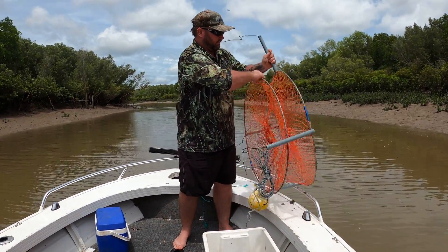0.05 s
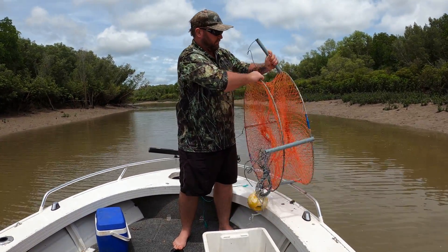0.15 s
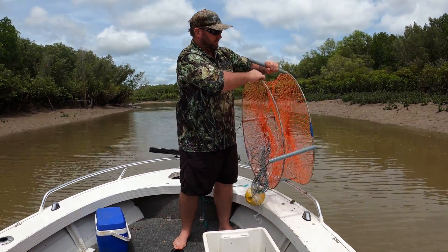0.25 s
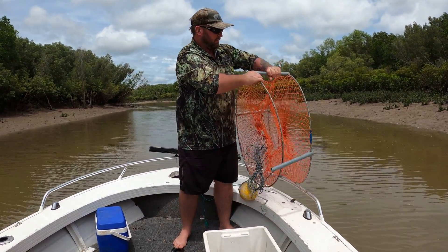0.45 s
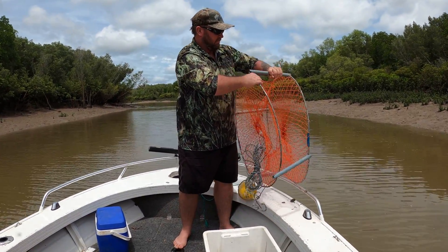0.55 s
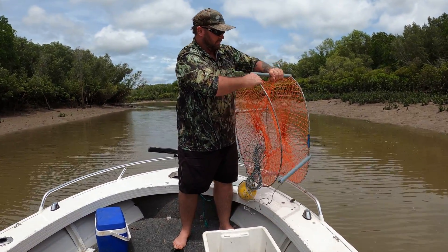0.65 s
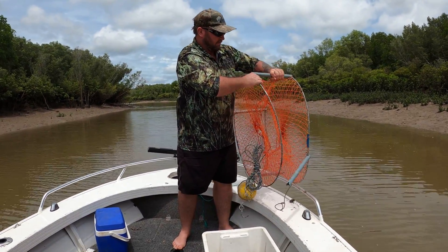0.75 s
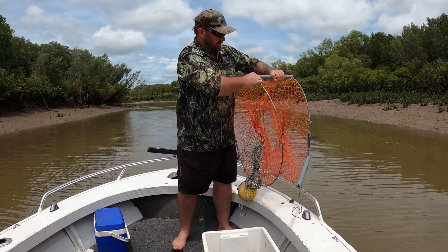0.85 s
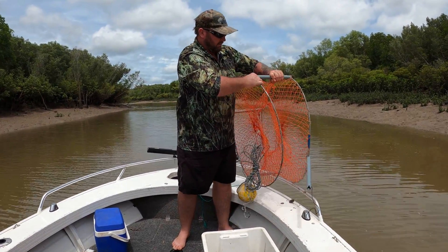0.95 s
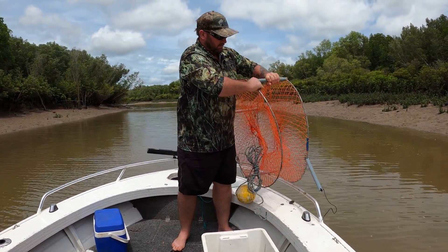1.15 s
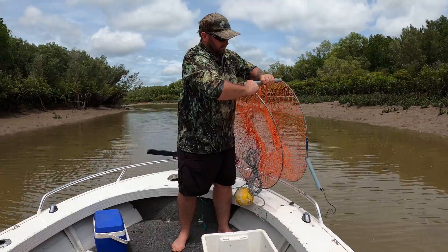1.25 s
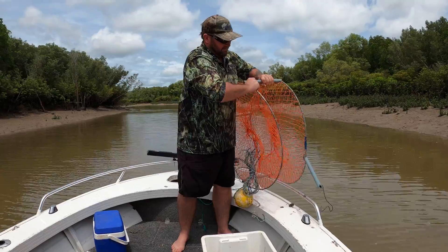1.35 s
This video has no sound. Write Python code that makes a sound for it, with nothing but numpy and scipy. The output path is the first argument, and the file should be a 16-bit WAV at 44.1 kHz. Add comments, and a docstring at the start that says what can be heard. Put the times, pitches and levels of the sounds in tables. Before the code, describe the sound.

A netted crab pot clatters against a small boat on a creek: two ringing metal knocks with rebounds and hollow booms, then a soft scrape and light ticks. Faint wind and water rumble underneath.

```python
"""Crab pot on the bow

A netted crab pot is handled on a small boat. Its metal frame knocks on the gunwale twice, each time
with a rebound: the frame clacks, the gunwale and deck ring, the hull booms. Between the knocks wire
ticks, the net rustles and the hoop scrapes. Faint wind and creek water rumble around the hull."""
import sys
import numpy as np
from scipy.fft import rfft, irfft, next_fast_len
from scipy.io import wavfile
from scipy.ndimage import map_coordinates

SR = 44100
rng = np.random.default_rng(int(sys.argv[2]) if len(sys.argv) > 2 else 0)


def persist_wave(psi):
    """Save psi, clipped to +-1, as 16-bit WAV."""
    counts = np.round(np.clip(psi, -1, 1) * 32767).astype(np.int16)
    wavfile.write(sys.argv[1], SR, np.atleast_2d(counts).T)


N = 61739
T = np.arange(N) / SR


def amp(db):
    """Decibels to gain."""
    return 10 ** (np.asarray(db) / 20)


def unit(x):
    """Scale to rms 1."""
    return x / np.sqrt(np.mean(x ** 2) + 1e-20)


def along(points, hz):
    """Read a curve of (f/Hz, value) points on a log frequency axis."""
    f, value = np.transpose(points)
    return np.interp(np.log(hz + 1), np.log(f + 1), value)


def filtered(x, response):
    """EQ x with a response given as a function of frequency."""
    size = next_fast_len(N + 8192)
    return irfft(rfft(x, size) * response(np.fft.rfftfreq(size, 1 / SR)), size)[..., :N]


def noise(spectrum):
    """Coloured noise of rms 1."""
    return unit(filtered(rng.standard_normal(N), lambda hz: amp(along(spectrum, hz))))


def wobble(rate):
    """A smooth random curve, rate knots a second."""
    return map_coordinates(rng.standard_normal(2048), [T * rate], mode="wrap")


def add(track, s, sound):
    """Mix a sound into the track at s seconds."""
    part = track[max(round(s * SR), 0):][:len(sound)]
    part += sound[:len(part)]


def stroke(start, end):
    """The envelope of one rub: it swells and fades as a rounded arch."""
    return np.sqrt(np.abs(np.sin(np.pi * np.clip((T - start) / (end - start), 0, 1))))


def decay(t, t60):
    """An envelope that falls 60 dB in t60 seconds."""
    return np.exp(-np.log(1000) * t / t60)


def ring(modes, rise_s, scatter_db=2, pitch=1, tilt_db=0, phase_spread=1, detune=0, size=32768):
    """A struck part's decaying modes; levels, phases and, with detune, pitches vary per blow."""
    hz, db, t60 = np.transpose(modes)[:, :, None]
    t = T[:size]
    gain = amp(db + tilt_db * np.log2(hz / hz[0]) + scatter_db * rng.standard_normal(hz.shape))
    hz = hz * pitch * (1 + detune * rng.standard_normal(hz.shape))
    phase = phase_spread * rng.uniform(-0.57, 0.43, hz.shape)
    partials = gain / np.linalg.norm(gain) * np.sin(2 * np.pi * (hz * t + phase)) * decay(t, t60)
    return np.sqrt(2) * partials.sum(0) * (1 - np.exp(-t / rise_s))


def burst(spectrum, t60_curve, rise_s, tilt_db=0, size=32768):
    """The dense modes of a blow: noise that dies band by band, with a quiet, longer after-rattle."""
    tail_db, tail_stretch = -18, 2.5
    hz, t = np.fft.rfftfreq(size, 1 / SR), T[:size]
    colour = amp(along(spectrum, hz) + tilt_db * np.log2(np.clip(hz, 1500, 9000)))
    bins = rfft(unit(irfft(rfft(rng.standard_normal(size)) * colour)))
    centres_hz = np.geomspace(250, 16000, 7)
    out = np.zeros(size)
    for centre, weights in zip(centres_hz, np.eye(len(centres_hz))):
        band = irfft(bins * along(np.c_[centres_hz, weights], hz))
        t60 = along(t60_curve, centre)
        out += band * (decay(t, t60) + amp(tail_db) * decay(t, t60 * tail_stretch))
    return out * (1 - np.exp(-t / rise_s))


def wind_and_creek():
    """The bed: wind and water rumble in the hull under a faint, steady wash."""
    # colours of the rumble and the wash (f/Hz, level/dB)
    rumble_eq = [(12, -6), (26, 7.5), (36, 5), (50, -1.5), (65, -0.5), (100, 3.5), (130, -1.5), (180, -8.5),
                 (250, -16), (330, -21), (700, -76), (3000, -100)]
    wash_eq = [(150, -8.5), (300, 3), (540, -2), (750, -11), (1300, -8), (2000, -16), (3200, -20),
               (5000, -23.5), (8500, -30.5), (12000, -44.5), (16000, -74)]
    # the rumble's swells and dips (t/s, level/dB)
    swells = [(0, -36), (.05, -34.5), (.12, -38), (.2, -39.5), (.26, -28), (.55, -30.5), (.86, -29),
              (.93, -39.5), (.98, -36.5), (1.04, -39), (1.17, -31.5), (1.4, -34.5)]
    rumble = amp(np.interp(T, *np.transpose(swells))) * noise(rumble_eq)
    return rumble + amp(-54.5) * noise(wash_eq)


def wind_buffet():
    """Wind brushes the microphones with a soft, deep flutter."""
    # colour of the turbulence (f/Hz, level/dB)
    buffet_eq = [(10, -9), (28, -8), (60, -8.5), (150, -32.5), (600, -36), (3000, -64)]
    return amp(-46.5) * noise(buffet_eq)


def net_rustle():
    """The net rustles in short strokes of fine-grained noise."""
    # moves of the net (start t/s, end t/s, level/dB, brightness/dB per octave)
    moves = [(-.02, 0.017, -46.5, -2), (0.016, 0.088, -49.5, -1), (0.07, 0.124, -56.5, 6.5),
             (.15, 0.189, -62, 3), (0.24, 0.387, -58.5, 1), (0.496, 0.64, -56, -3),
             (0.694, 0.775, -57, 4.5), (0.913, 1.02, -64.5, 2.5), (1.272, 1.42, -62.5, 6.5)]
    # colour of the rustle (f/Hz, level/dB)
    net_eq = [(400, -4.5), (1500, -4), (3300, 3.5), (5500, -4.5), (9500, -14), (12500, -20.5), (16000, -56)]
    out = np.zeros(N)
    for start, end, db, bright_db in moves:
        hiss = noise([(hz, level + bright_db * np.log2(hz)) for hz, level in net_eq])
        grain = amp(2.1 * wobble(rate=650))
        out += amp(db) * stroke(start, end) * unit(hiss * grain)
    return out


def hoop_scrape():
    """The hoop drags in tiny slips that ring the frame and gunwale."""
    # drags along the gunwale (start t/s, end t/s, level/dB)
    drags = [(.065, .095, -47), (.465, .515, -49), (.955, 1.03, -55), (1.09, 1.16, -50.5),
             (1.145, 1.225, -43), (1.27, 1.42, -54.5)]
    # resonances under the hoop (f/Hz, width/Hz, level/dB)
    resonances = [(521, 52, 6), (603, 78, 0), (897, 69, 2), (1330, 126, -3), (1500, 66, -6),
                  (2214, 84, -4.5), (2760, 170, -7.5), (2940, 570, -15.5), (4370, 340, -21.5)]
    slips_per_s = 5000
    slips = (rng.random(N) < slips_per_s / SR) * rng.standard_normal(N)

    def body(hz):
        """Band-pass resonances of alternating polarity."""
        return sum((-1) ** k * amp(db) * 1j * hz * width / (centre ** 2 - hz ** 2 + 1j * hz * width)
                   for k, (centre, width, db) in enumerate(resonances))

    envelope = sum(amp(db) * stroke(start, end) for start, end, db in drags)
    return envelope * unit(filtered(slips, body))


def wire_ticks():
    """Wire touches wire; now and then a small metal fastener rings out."""
    # light contacts (t/s, tick level/dB, brightness/dB per octave, fastener level/dB)
    contacts = [(0.1232, -39, 0, -70), (0.163, -58.5, 3.5, -79), (0.2945, -50, 19, -42),
                (0.371, -60, 16, -87), (0.653, -41.5, -11, -87), (0.925, -61.5, 13, -82),
                (0.958, -52, -10, -81), (1.154, -50, -10.5, -60), (1.299, -48, -26, -86)]
    # the tick's colour (f/Hz, level/dB) and decay (f/Hz, t60/s)
    tick_eq = [(500, -17), (1500, -12), (3200, 2), (6000, -0.5), (9000, -11.5), (12500, -20.5),
               (16000, -30.5)]
    tick_t60 = [(1000, 0.019), (4000, 0.041), (12000, 0.036)]
    # modes of the fastener (f/Hz, level/dB, t60/s)
    fastener_modes = [(4440, 8.5, 0.051), (5970, -13, .04), (8300, -14, .03)]
    out = np.zeros(N)
    for s, tick_db, bright_db, fastener_db in contacts:
        add(out, s, amp(tick_db) * burst(tick_eq, tick_t60, rise_s=0.00059, tilt_db=bright_db))
        add(out, s, amp(fastener_db) * ring(fastener_modes, rise_s=0.0017))
    return out


def hull_booms():
    """The hull booms under the knocks and throbs as it rings on."""
    # booms of the hull as the pot knocks and bumps while it settles (t/s, level/dB, tilt/dB per octave, pitch
    # ratio)
    booms = [(0.2292, -9, 3, 0.93), (0.2786, -17, -1.5, 1.16), (.322, -18.5, 1, 0.93),
             (0.4305, -24, -1, 1.05), (0.5, -30, -10, 1.2), (0.6244, -11, -2.5, 0.96),
             (0.6739, -23, 4, 1.0), (0.7651, -17.5, -6.5, .97), (0.816, -36, -5, 1.03),
             (1.005, -27.5, -8, 1), (1.3418, -34.5, -3, 1.02)]
    # low modes of the hull (f/Hz, level/dB, t60/s)
    modes = [(77, -24.5, 0.85), (99.03, -1.5, 0.43), (119.4, -3, .35), (160, -4.5, 0.25), (179.3, -10, 0.5),
             (239.4, -4.5, 0.25)]
    out = np.zeros(N)
    for s, db, tilt_db, pitch in booms:
        boom = ring(modes, rise_s=0.0037, scatter_db=1, pitch=pitch, tilt_db=tilt_db, phase_spread=0.1)
        add(out, s, amp(db) * boom)
    return out


def frame_snap():
    """The bright edge of a knock: a crack of noise and the frame's highest, shortest modes."""
    # the crack's colour (f/Hz, level/dB) and decay (f/Hz, t60/s)
    snap_eq = [(1500, -49), (3500, -6.5), (5400, -4.5), (7000, -11.5), (8500, -7), (10000, -22.5),
               (12000, -29.5), (15500, -36)]
    snap_t60 = [(2000, 0.043), (5500, 0.022), (9000, 0.033), (14000, 0.036)]
    # treble modes of the frame (f/Hz, level/dB, t60/s)
    modes = [(5160, -4.5, 0.048), (5490, 4, 0.025), (5920, -2, 0.049), (6440, -7, 0.034),
             (7520, -36.5, 0.016), (8030, -13.5, 0.02)]
    return burst(snap_eq, snap_t60, rise_s=0.0003) + amp(-3) * ring(modes, rise_s=0.0003)


def frame_clack():
    """The body of a knock: noise whose treble dies first, over the metal frame's ring."""
    # the clack's colour (f/Hz, level/dB) and decay (f/Hz, t60/s)
    clack_eq = [(150, -33), (500, -16.5), (900, -1), (1500, 3.5), (1900, -2.5), (2800, 0), (3800, -2.5),
                (4500, -9.5), (6500, -8.5), (10000, -67.5), (16000, -86)]
    clack_t60 = [(400, 0.48), (1000, 0.15), (2500, 0.084), (5000, 0.036), (12000, 0.016)]
    # midrange modes of the frame (f/Hz, level/dB, t60/s)
    modes = [(1050, -1, .09), (1570, -7, .11), (1915, -3, .12), (2230, 0, .11), (2450, -2, .1),
             (2895, -2, .11), (3030, -5, .1), (3630, -2, .08), (3880, -4, .08)]
    return burst(clack_eq, clack_t60, rise_s=0.0005) + amp(-7) * ring(modes, rise_s=0.0005)


def pot_knocks():
    """The frame snaps and clacks at once; deck and gunwale take up the blow a little later."""
    # blows of the frame on the boat (t/s, deck level/dB, deck tilt/dB per octave,
    # gunwale level/dB, gunwale pitch ratio, clack level/dB, snap level/dB)
    blows = [(.2210, -18.5, 4.5, -15.5, 1.065, -19.5, -36.5), (.2380, -24, -9.5, -36, 0.96, -38.5, -55),
             (0.324, -24.5, 31, -28, 1.03, -35, -55), (0.33, -35.5, 26, -37.5, 1.2, -31.5, -44),
             (0.427, -34.5, -41.5, -64.5, 0.35, -47, -46), (0.4639, -47.5, 16, -35.5, 0.73, -40, -56),
             (0.6038, -25, -2.5, -15, 0.94, -18.5, -19), (0.6213, -26, 2, -24.5, 1.0, -35.5, -65),
             (0.703, -36, 10, -33.5, 1.065, -47, -70), (0.7339, -28.5, 3, -27, 1.22, -27.5, -29.5),
             (.7425, -36, 11, -33, 1.03, -39, -47), (.7590, -33.5, 11, -50, 1.3, -43.5, -60),
             (0.799, -44, -11, -63, 1.2, -45.5, -70), (0.984, -41.5, -1.5, -49, 1.0, -50.5, -54.5),
             (1.335, -36, 13.5, -50, 1.22, -53, -54.5)]
    # modes of the gunwale and the deck (f/Hz, level/dB, t60/s)
    gunwale_modes = [(1212, -6, .11), (1272.4, 0.5, 0.096), (1306, 1, 0.07), (1348, -9, 0.1),
                     (1454, -11, .1), (1580, -10.5, 0.07)]
    deck_modes = [(286, -8, 0.14), (373, -4.5, 0.22), (423.2, -6, 0.33), (450, -7.5, 0.3), (509, -15, 0.39),
                  (545.6, -4.5, 0.19), (607.5, -3, 0.13), (698.7, -14, 0.08)]
    gunwale_delay_s, deck_delay_s = 0.0093, 0.00094
    out = np.zeros(N)
    for s, deck_db, tilt_db, gunwale_db, pitch, clack_db, snap_db in blows:
        add(out, s, amp(snap_db) * frame_snap())
        add(out, s, amp(clack_db) * frame_clack())
        gunwale = ring(gunwale_modes, rise_s=0.0011, pitch=pitch, phase_spread=0.39)
        add(out, s + gunwale_delay_s, amp(gunwale_db) * gunwale)
        deck = ring(deck_modes, rise_s=0.002, tilt_db=tilt_db, detune=0.034)
        add(out, s + deck_delay_s, amp(deck_db) * deck)
    return out


def scene():
    """The pot sits slightly right; an echo off the boat's side and the wind buffet add width."""
    # balance (f/Hz, left minus right level/dB) and lead of the left channel (f/Hz, phase/rad)
    pan = [(200, 0.5), (1300, 0.5), (2600, 1.5), (4400, 0), (8100, -5), (14000, 0)]
    phase_lead = [(0, 0), (3450, -1.24), (4650, -1.37), (6500, -1.85), (8000, -1.58), (10000, -1.17),
                  (13000, -2)]
    # colour of the side echo (f/Hz, level/dB)
    echo_eq = [(60, -33), (150, -34), (350, -18), (1500, -13.5), (5000, -33.5), (14000, -30)]
    echo_s = 0.0063
    sides = np.array([[1], [-1]])

    def placement(hz):
        """Each channel takes half of the level and phase offset."""
        lead = np.interp(hz, *np.transpose(phase_lead))
        return amp(sides * along(pan, hz) / 2) * np.exp(0.5j * sides * lead)

    mono = pot_knocks() + hull_booms() + wire_ticks() + net_rustle() + hoop_scrape() + wind_and_creek()
    echo = filtered(mono, lambda hz: amp(along(echo_eq, hz)) * np.exp(-2j * np.pi * hz * echo_s))
    return filtered(mono, placement) + sides * (echo + wind_buffet())


def record(dry):
    """A brick-wall low-pass takes off the very top."""
    return filtered(dry, lambda hz: hz < 15700)


dry = scene()
out = record(dry)
persist_wave(out)
```